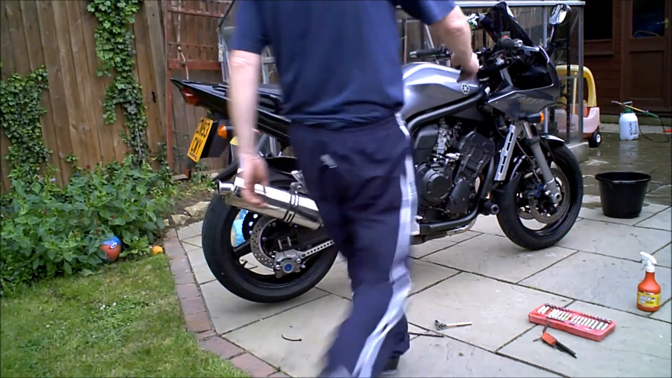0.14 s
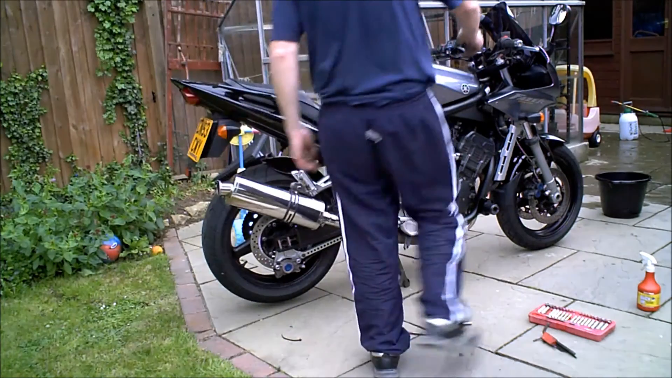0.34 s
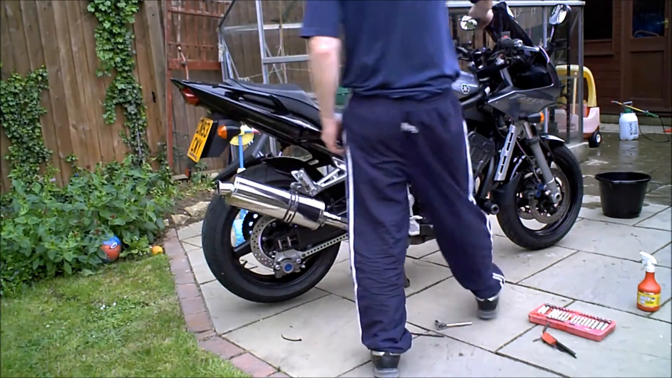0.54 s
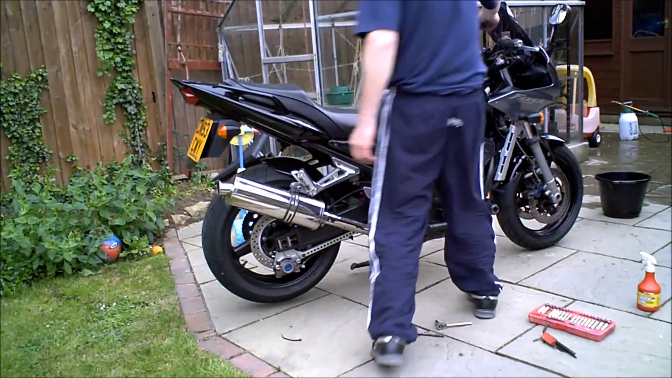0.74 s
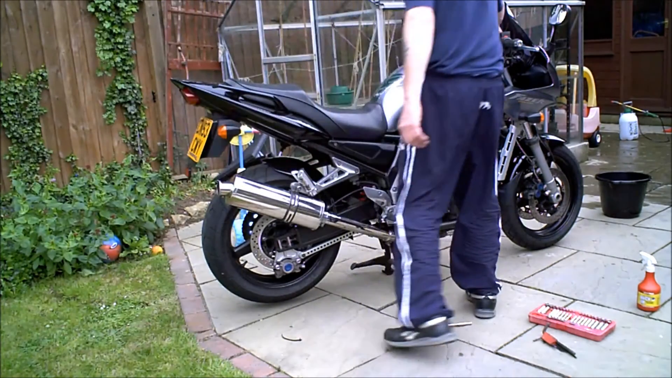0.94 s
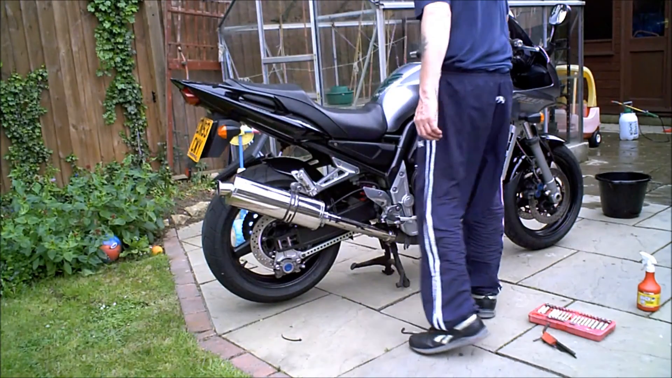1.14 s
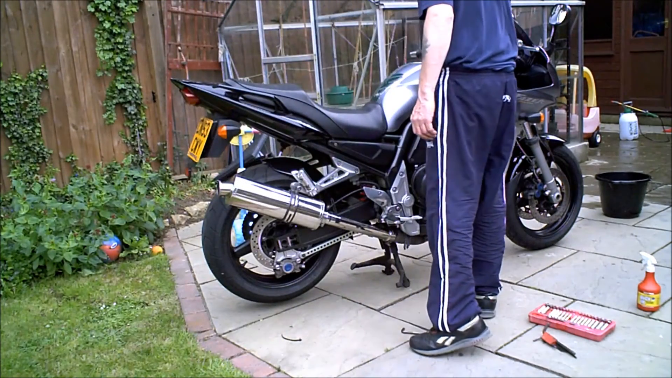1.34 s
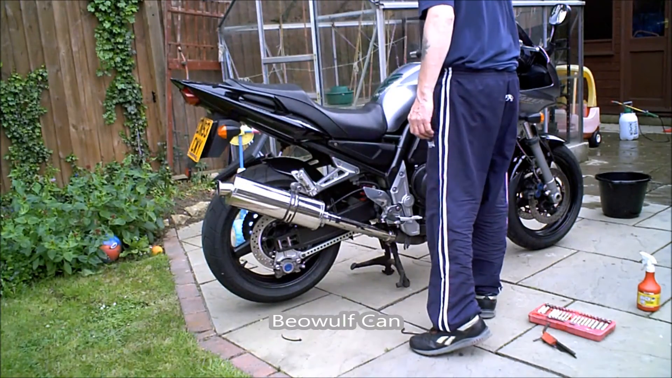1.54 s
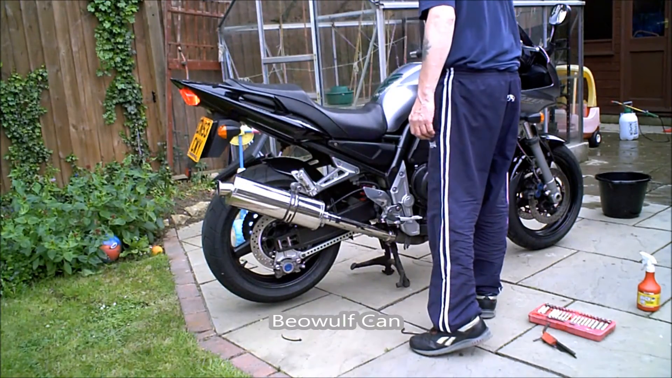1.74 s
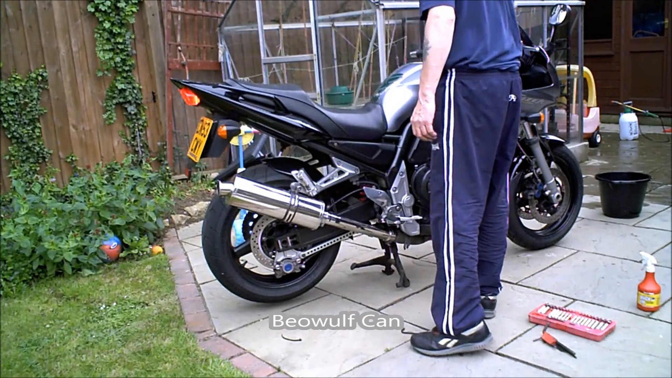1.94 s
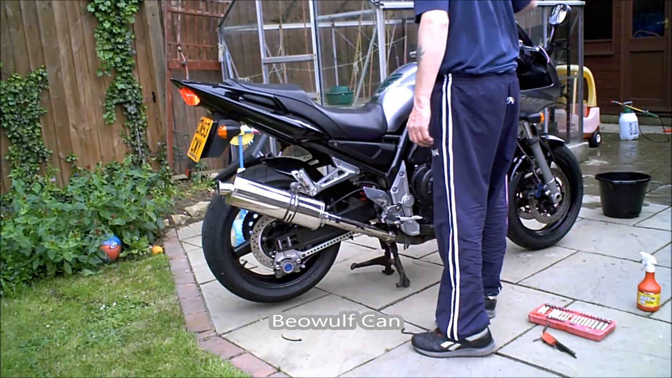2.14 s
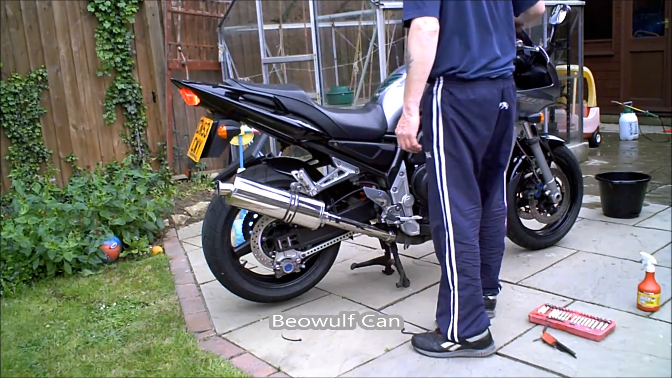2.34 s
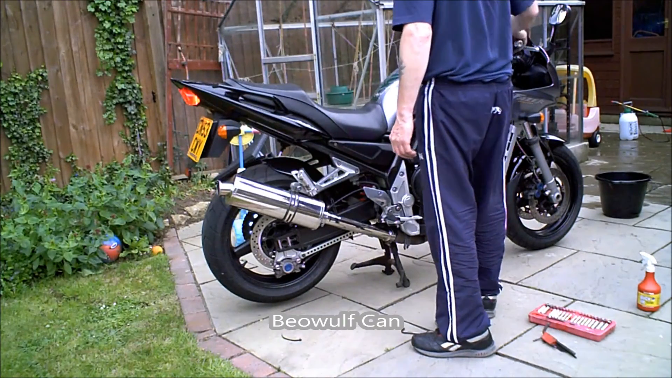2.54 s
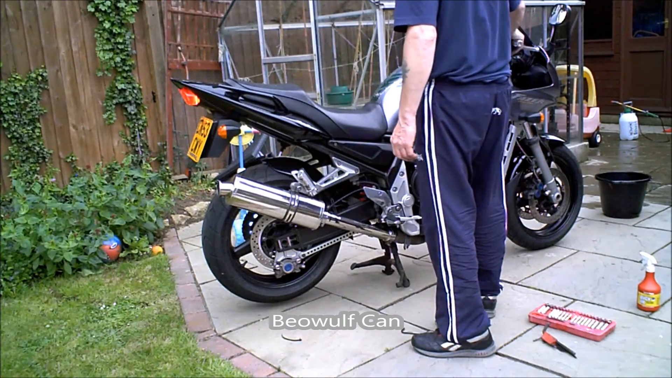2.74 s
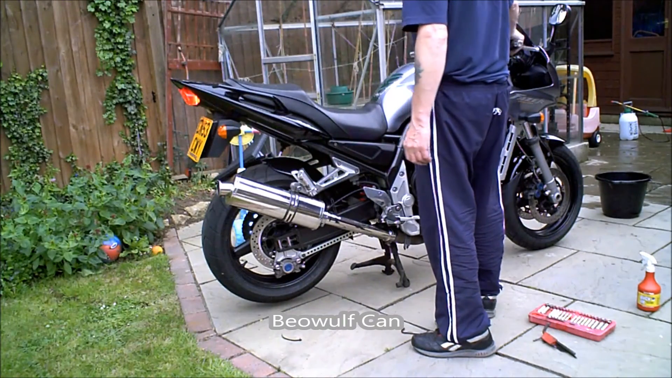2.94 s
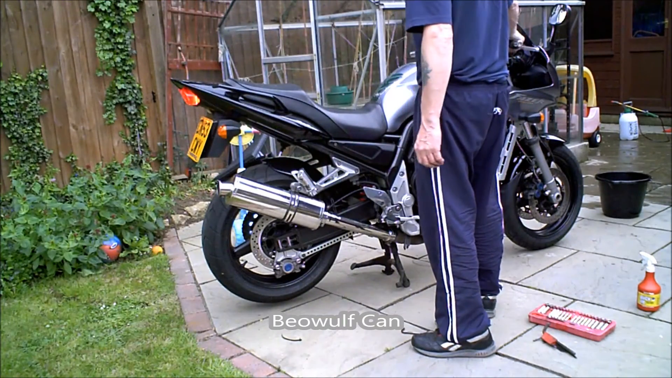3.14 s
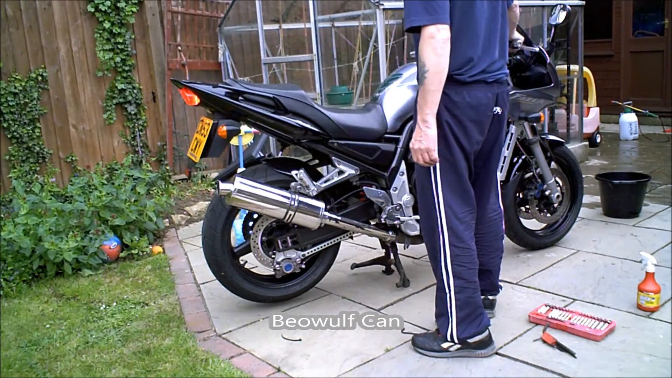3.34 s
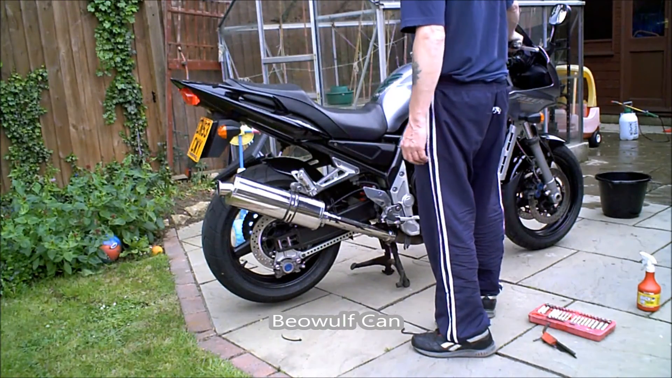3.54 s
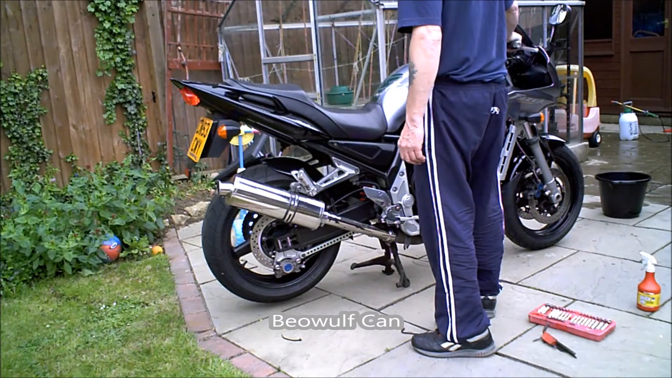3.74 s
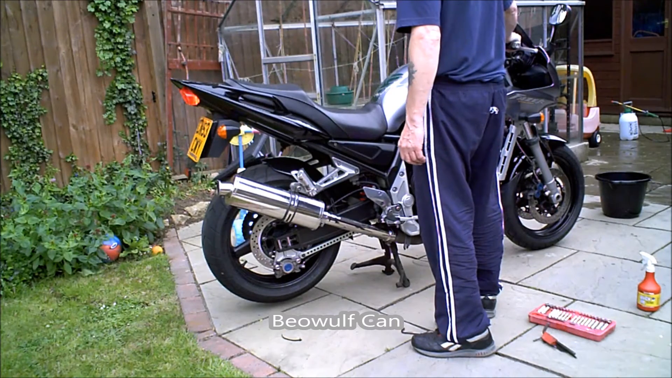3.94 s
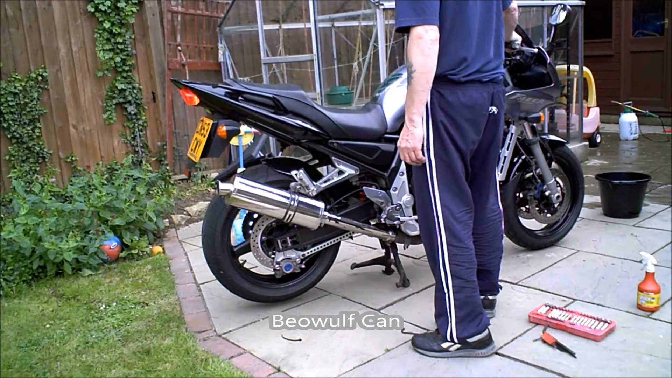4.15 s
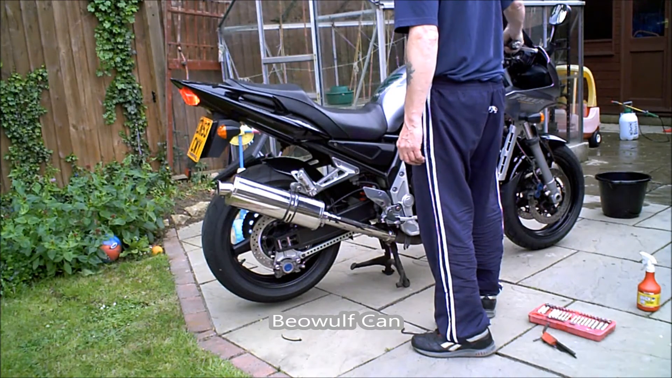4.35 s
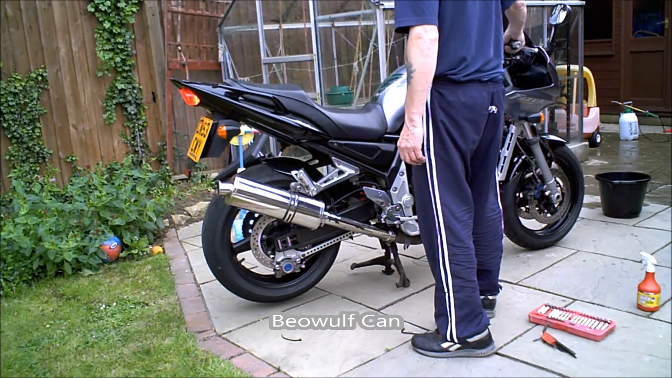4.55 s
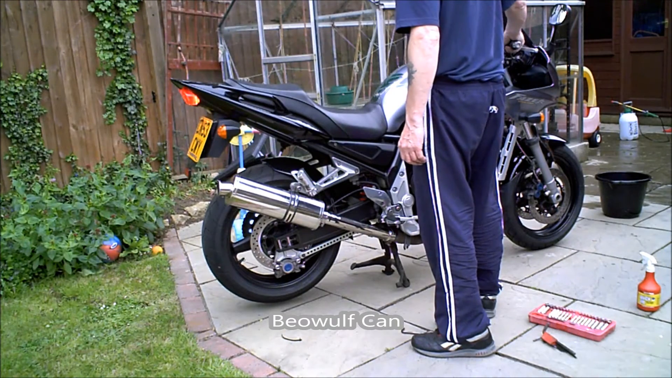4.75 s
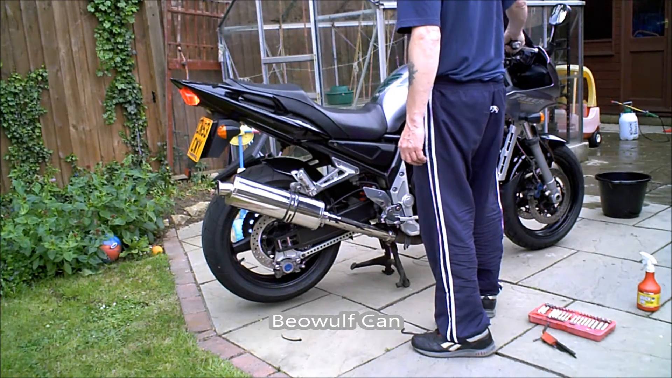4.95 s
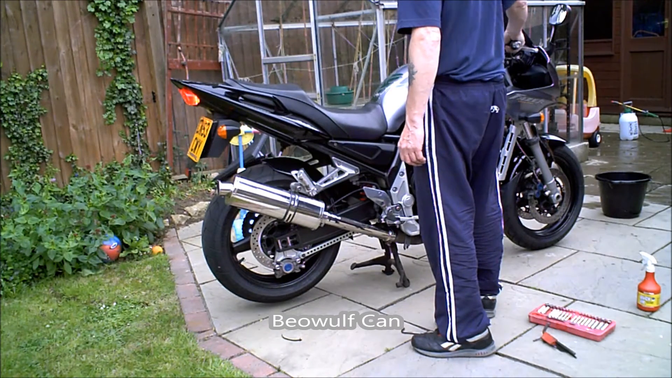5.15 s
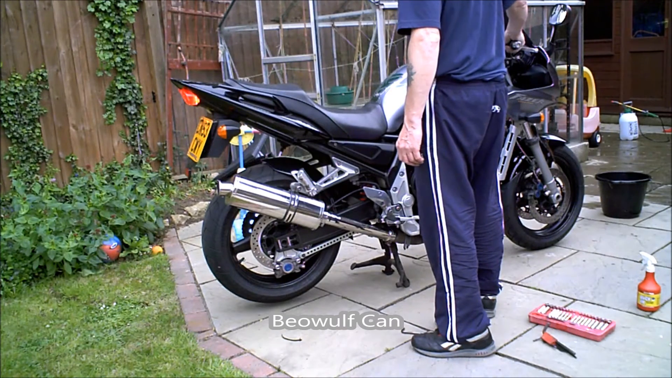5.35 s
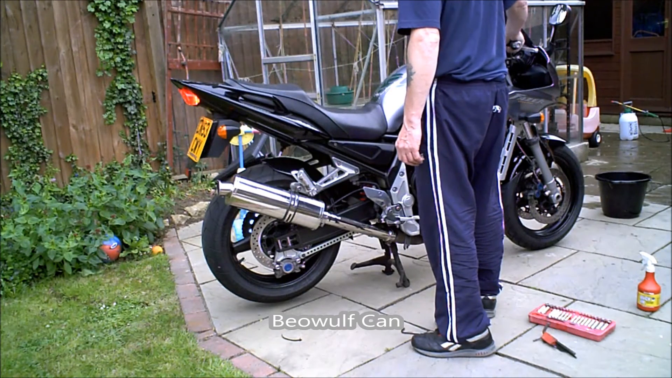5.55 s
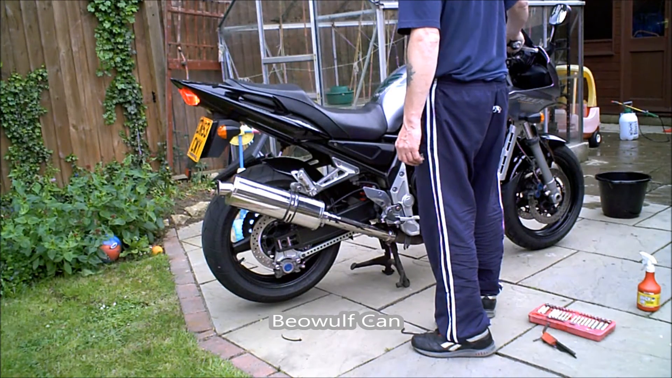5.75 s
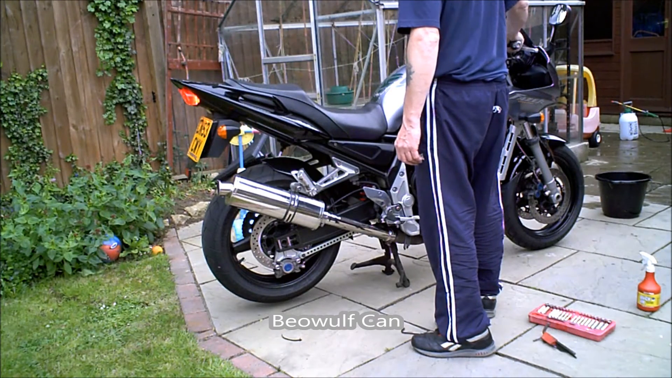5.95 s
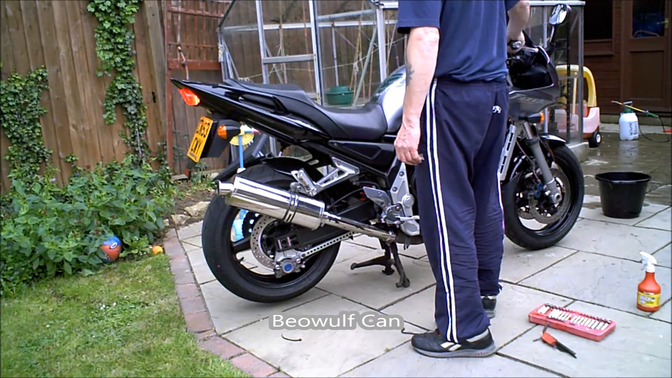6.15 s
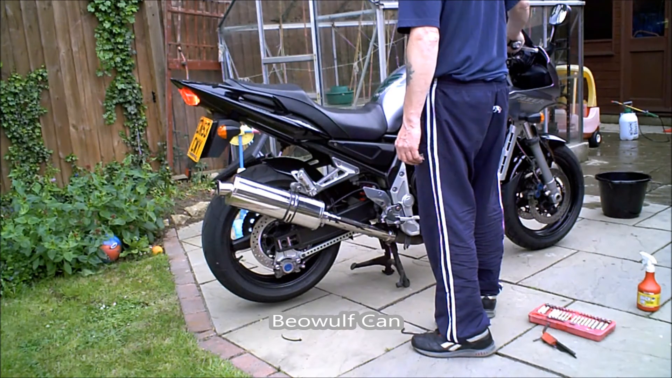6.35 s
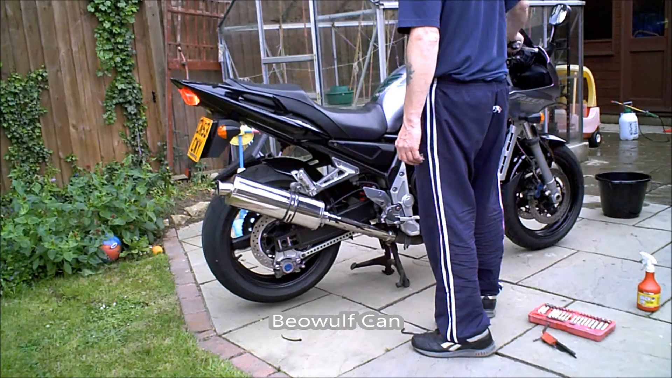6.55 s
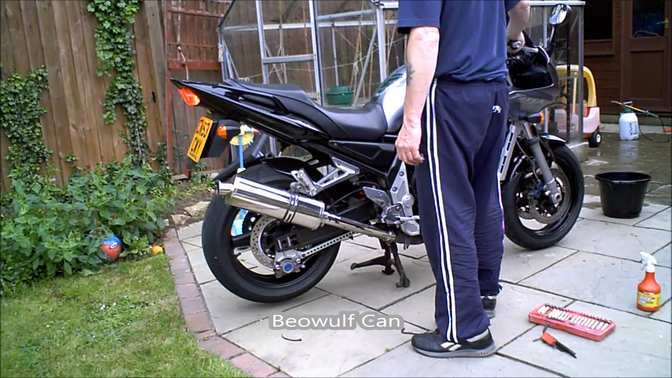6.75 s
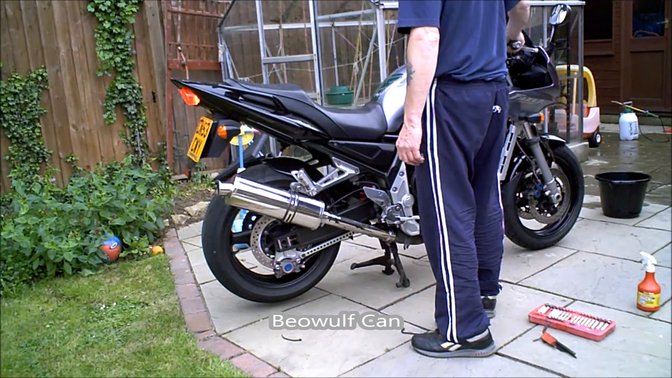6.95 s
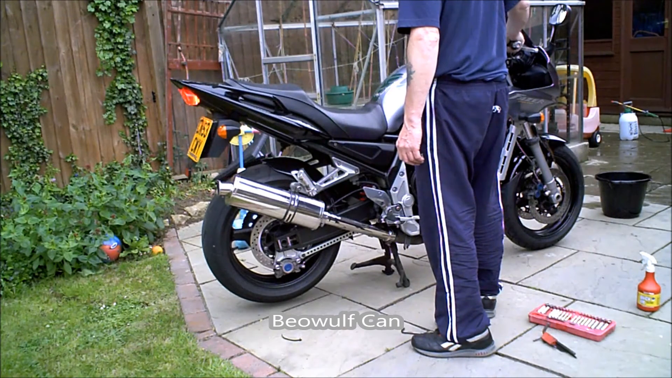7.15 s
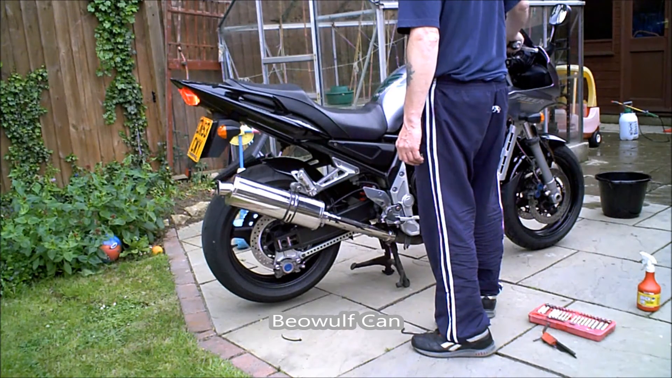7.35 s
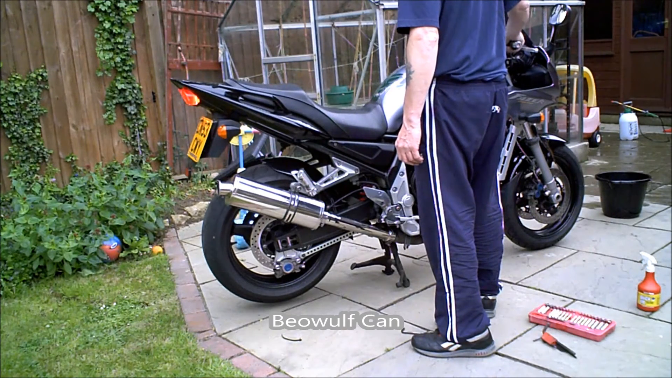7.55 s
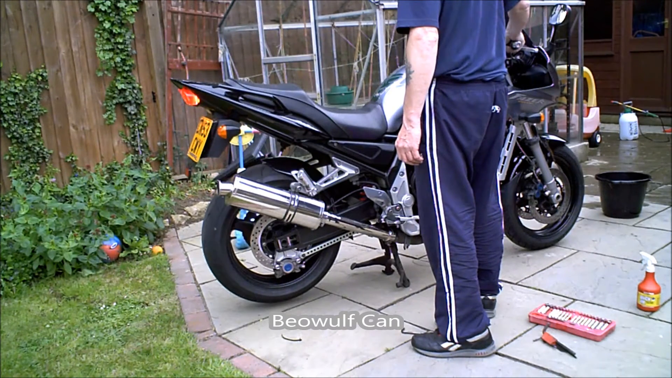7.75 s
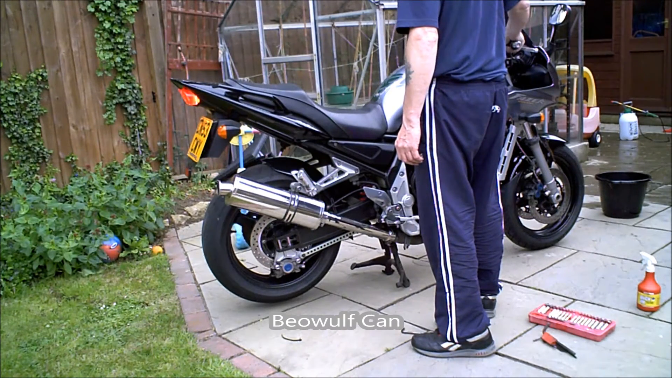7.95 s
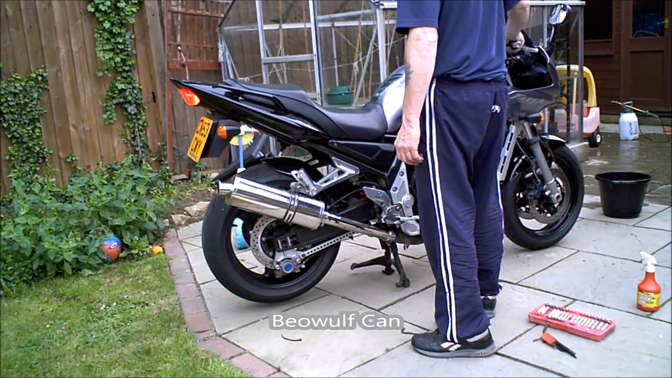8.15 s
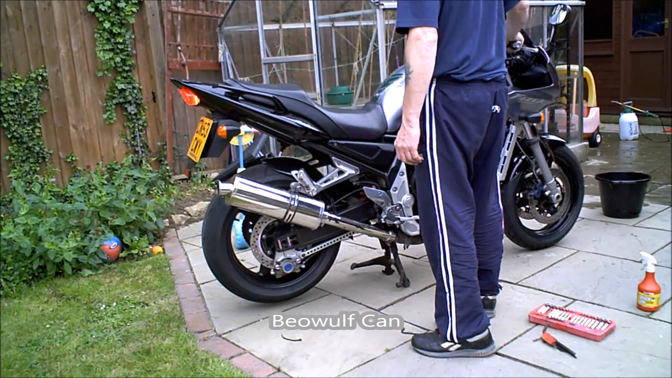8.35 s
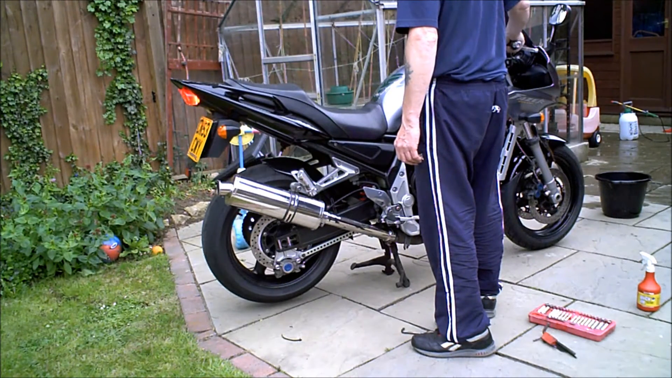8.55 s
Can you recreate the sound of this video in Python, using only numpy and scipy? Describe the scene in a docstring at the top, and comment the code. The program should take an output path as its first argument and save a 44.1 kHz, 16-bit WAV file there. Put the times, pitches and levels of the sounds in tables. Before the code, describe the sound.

A few soft shoe steps on patio slabs, a small metallic key snap and a faint sleeve rustle over a very quiet outdoor hush. After a pause, a brief grinding starter labours and the four-cylinder motorcycle engine catches with a low boom, idling fast and unevenly with ticking valves. Four sharp throttle blips follow, each falling back to idle. Fixed microphone a few metres away, short hard reflections from paving and fence.

```python
"""A four-cylinder motorcycle engine catches, idles fast and unevenly, then is revved by four throttle blips.
Before it: steps on a patio, key clicks, a sleeve, the grinding starter. A faint outdoor hush lies under all.
Firing pulses ring pipe and silencer; noise bursts make block and valves, swept sines the gear whine.
The starter is resonant noise with sagging tones; steps and key are decaying noise.
Hard echoes and a short diffuse tail stand for paving, fence and house wall."""
import sys
import numpy as np
from scipy import signal
from scipy.fft import rfft, irfft
from scipy.io import wavfile
from scipy.ndimage import uniform_filter1d

SR = 44100
rng = np.random.default_rng(int(sys.argv[2]) if len(sys.argv) > 2 else 0)


def bounce(signal):
    """Save signal as a 16-bit WAV file at the path given by the first command-line argument."""
    frames = np.transpose(np.atleast_2d(signal))
    limited = np.clip(frames, -1, 1)
    pcm = np.round(limited * 32767).astype(np.int16)
    wavfile.write(sys.argv[1], SR, pcm)


N = 379701
T = np.arange(N) / SR

# outdoor hush spectrum: (f/Hz, level/dB)
GARDEN_SPECTRUM = [(18, -92), (30, -37), (145, -17), (318, -4.5), (471, -3), (523, -1.5), (566, -3.5),
                   (645, -2), (816, -1.5), (981, 0), (1570, -7), (1840, -8.5), (2100, -10), (2330, -9.5),
                   (15800, -29)]
GARDEN_DB = -63
# shoes on paving: (t/s, level/dB, centre f/Hz, width/Hz, decay/s)
STEPS = [(.144, -49.5, 322, 300, .01), (.16, -46.5, 670, 350, 0.025), (0.173, -55.5, 1140, 400, 0.012),
         (.178, -58, 1920, 50, 0.02), (.206, -51.5, 5000, 7000, 0.0015), (.879, -61.5, 1190, 500, .022),
         (.932, -49, 650, 130, 0.01), (1.97, -61, 700, 300, .015), (2.082, -54.5, 640, 500, .008)]
# key clicks: (t/s, level/dB)
KEY_CLICKS = [(1.699, -47.5), (1.704, -49), (1.715, -56)]
# key click spectrum: (f/Hz, level/dB)
KEY_SPECTRUM = [(180, -52), (300, -11), (372, -20), (825, -1), (1020, -14), (1130, -3), (1920, -11),
                (2860, -6.5), (5940, -19), (7740, -9), (11300, -25), (13200, -21), (15800, -42)]
# ignition lock modes: (f/Hz, level/dB, t60/s)
LOCK_MODES = [(823, -6, .12), (1250, 3, .1), (2540, 3, 0.036), (2850, 3, 0.077), (4140, -12, .25),
              (7585, 2, .14), (8473, -10, .2), (12700, 2, .14)]
# sleeve rustle as the arm reaches for the bars: (t/s, level/dB)
SLEEVE_LEVEL = [(2.5, -94), (2.6, -72), (2.69, -66), (2.76, -78), (2.85, -92)]

STARTER_ON_S, STARTER_OFF_S, STARTER_RUNDOWN_S, STARTER_DB = 3.56, 4.02, 0.026, -44.5
# starter spectrum: (f/Hz, level/dB)
STARTER_SPECTRUM = [(29, -74), (50, -45), (251, -23.5), (297, -22), (343, -15), (530, -14.5), (1060, -4),
                    (1290, -6.5), (1530, -5), (1990, -15), (2300, -10.5), (3550, -16.5), (8450, -33),
                    (15800, -49)]
# starter drive and crankcase resonances: (f/Hz, width/Hz, level/dB)
CASE_MODES = [(830, 86, -6), (1041, 120, -5), (1540, 87, -22), (1860, 74, -6), (2297, 83, -1),
              (2684, 120, -4), (4220, 76, -6), (4570, 73, -7.5), (8500, 177, -8)]
# compressions the starter labours against:
# (t/s, length/s, load/dB, gear tone f/Hz, gear tone level/dB, upper tone f/Hz, upper tone level/dB)
COMPRESSIONS = [(3.612, 0.037, -43, 1686, -39, 2950, -43.5), (3.673, 0.047, -39.5, 1130, -31, 2360, -44),
                (3.723, 0.043, -41.5, 1660, -33.5, 1880, -35), (3.813, 0.027, -36.5, 1104, -35, 2400, -37),
                (3.9, 0.019, -37, 1070, -34.5, 2420, -36)]
LOAD_RISE_S, LOAD_FALL_S = 0.012, 0.0072
# share of its starting pitch that each tone loses per second under load
GEAR_SAG_PER_S, UPPER_SAG_PER_S = 3.18, 1.29

CATCH_S, CATCH_RISE_S = 3.95, 0.014
# cold engine, throttle shut: (t/s, speed/firings per s, boom level/dB)
IDLE = [(3.95, 45, -46.5), (4.03, 46, -44), (4.12, 45.5, -43), (4.5, 41, -47.5), (4.6, 40.5, -40.5),
        (5.05, 40.6, -40), (5.4, 39.3, -42.5), (5.82, 36, -43.5), (5.95, 39, -46), (6.0, 52, -43.5),
        (6.25, 44, -49), (6.5, 46, -48), (6.58, 52, -46.5), (7.3, 40.7, -47), (8.35, 35.5, -45.5)]
IDLE_HZ = 40  # firings per second, reference for the level laws
# throttle twists, the first two as the engine catches:
# (opens t/s, shuts t/s, opening time/s, opening/0-1, top speed/firings per s)
BLIPS = [(3.984, 4.036, 0.041, 0.13, 48), (4.118, 4.265, 0.017, 0.2, 59.4),
         (5.994, 6.134, 0.0067, 0.48, 83), (6.594, 6.726, 0.0052, 0.89, 111),
         (7.414, 7.599, 0.056, 0.85, 127), (8.394, 8.61, 0.058, 0.63, 98)]
THROTTLE_SHUT_S = 0.031
CLIMB_CURVE = 1.25  # exponent; above 1, the speed climbs slowly at first
COAST_S, COAST_TO_HZ = .375, 20  # friction drags the speed towards this until the idle holds it
# until first revved, the idle surges and sags in level
SURGE_HZ, SURGE_PEAK_S, SURGE_END_S = 5, 5.015, 5.95
SURGE_BOOM_DB, SURGE_VALVES_DB = 1.5, 2
# runs of strong firings as the speed falls back: (t/s, extra boom level/dB)
PICKUPS = [(4.27, 1), (4.42, 7), (6.43, 6.5), (6.54, 8.5), (7.14, 3), (7.31, 9), (7.72, 8), (7.93, 5),
           (8.19, 7.5)]
PICKUP_S = 0.041
# firings whose timing is fixed: (t/s, level change/dB)
TIMED_FIRINGS = [(5.999, -6), (6.602, -1), (6.708, 0), (7.491, 4.5), (8.479, 4)]

# level laws: (shut level at idle/dB, shut slope/dB per speed doubling,
#              open level at idle/dB, open slope/dB per speed doubling)
BOOM_LAW = (0.5, 2, 9.5, 3)  # added to the boom level in IDLE
# silencer bark, same columns
BARK_LAW = (-56, 8, -37, 1.5)
# engine block, same columns
BLOCK_LAW = (-48.5, 3.5, -45, -1.5)
# valve gear, same columns
VALVES_LAW = (-53.5, 2, -40.5, -2)

# exhaust pipe resonances: (f/Hz, width/Hz, level/dB)
PIPE_MODES = [(88.5, 25.7, -14.5), (133.5, 22, -10), (198.6, 15.8, 6), (246, 6.2, 5), (276, 25, -25)]
# airbox resonances, heard through the open throttle: (f/Hz, width/Hz, level/dB)
AIRBOX_MODES = [(81.5, 45, -31), (137, 16, -2), (243.3, 9, 5)]
# silencer resonances, strongest with the throttle open: (f/Hz, width/Hz, level/dB)
BARK_MODES = [(291, 94, 0.5), (357.6, 20, 3), (417.3, 7.6, 4.5), (464.5, 15, 2.5), (540, 14, -13),
              (624, 15, -29), (1070, 105, -8)]
# gas crack spectrum: (f/Hz, level/dB)
CRACK_SPECTRUM = [(300, -24), (600, -17), (1100, 30), (1800, 11), (3000, -18), (4500, 18), (6500, -36),
                  (8500, 13), (10400, 6.5), (12500, 0), (16000, -12)]
# the first firings after a snap of the throttle gulp the biggest charge: crack boost and its decay
SNAP_DB, SNAP_S = 7, 0.098
# engine block spectrum: (f/Hz, level/dB)
BLOCK_SPECTRUM = [(310, -35.5), (520, -2), (632, 2.5), (696, -6.5), (761, 1.5), (873, -1), (954, -5.5),
                  (1060, 3.5), (1230, -4.5), (1480, -7), (1750, -6), (2060, -8.5), (2420, -7.5),
                  (3600, -18), (4680, -37.5), (7920, -120)]
# valve gear spectrum: (f/Hz, level/dB)
VALVES_SPECTRUM = [(1760, -26.5), (3000, -1.5), (3770, -1), (4250, 1), (4780, -1.5), (5340, -1.5),
                   (6580, -6.5), (7610, -1.5), (8050, -5), (8750, -2), (9450, -6), (10200, -5.5),
                   (13600, -24), (15200, -22), (15800, -37)]
TREBLE_VARIATION_DB = 1  # rms of a slight random level variation in the treble
# engine covers that rattle at speed: (f/Hz, width/Hz, level/dB)
COVER_MODES = [(1116, 130, -2), (1226, 53, -9), (1401, 29, 2.5), (1556, 26, -5), (1814, 50, -2),
               (2330, 370, -3.5), (5300, 740, -6)]
WHINE_DB, WHINE_DB_PER_DOUBLING = -50, 3.5

# echoes from paving, fence and wall: (delay t/s, level/dB)
ECHOES = [(.0031, -18.5), (0.0114, -17.5), (0.0195, -37.5)]
TOP_HZ = 15850


def undb(db):
    """Decibels to gain."""
    return 10 ** (np.asarray(db) / 20)


def curves(table):
    """Each column of a table, joined by straight lines in time."""
    s, *columns = np.transpose(table)
    return [np.interp(T, s, c) for c in columns]


def unit(x):
    """Scale to rms 1."""
    return x / np.sqrt(np.mean(x ** 2))


def steady(x, size=3500):
    """Scale to a running rms of 1."""
    power = uniform_filter1d(uniform_filter1d(x ** 2, size), size)
    return x / np.sqrt(power + 1e-18)


def noise():
    """White noise."""
    return rng.standard_normal(N)


def walk(rate_hz):
    """Smooth random curve of rms 1."""
    k = int(SR / rate_hz)
    stairs = np.repeat(rng.standard_normal(N // k + 1), k)
    return unit(uniform_filter1d(uniform_filter1d(stairs, k), k)[:N])


def through(x, response):
    """Pass a sound through an impulse response."""
    return signal.fftconvolve(x, response)[:N]


def colour(x, points, size=2048):
    """Minimum-phase filter of unit energy with the given (f/Hz, level/dB) outline."""
    hz, db = np.transpose(points)
    grid_hz = np.arange(size + 1) * SR / size / 2
    outline_db = np.interp(np.log(grid_hz + 1), np.log(hz), db)
    # fold the cepstrum to make the filter causal
    cepstrum = irfft(np.log(undb(outline_db)))
    cepstrum[1:size] *= 2
    cepstrum[size + 1:] = 0
    response = irfft(np.exp(rfft(cepstrum)))[:size]
    return through(x, response / np.linalg.norm(response))


def ring(x, modes, size=12000):
    """Decaying resonances (f/Hz, width/Hz, level/dB), unit energy in all."""
    t = T[:size]
    response = sum(undb(db) * width_hz * np.exp(-np.pi * width_hz * t) * np.cos(2 * np.pi * hz * t)
                   for hz, width_hz, db in modes)
    return through(x, response / np.linalg.norm(response))


def band(x, low_hz, high_hz, order=3):
    """Band-pass."""
    edges_hz = [low_hz, min(high_hz, .45 * SR)]
    return signal.sosfilt(signal.butter(order, edges_hz, "band", fs=SR, output="sos"), x)


def fade(start_s, decay_s):
    """Sudden start, exponential decay."""
    return (T >= start_s) * np.exp(-np.maximum(T - start_s, 0) / decay_s)


def gate(start_s, end_s, attack_s, release_s):
    """Straight rise, hold, exponential release."""
    rise = np.clip((T - start_s) / attack_s, 0, 1)
    return rise * np.exp(-np.maximum(T - end_s, 0) / release_s)


def pulses(turns, scatter_db, jitter_s, lumpy_db=0):
    """One pulse per whole count, random in size and timing; lumpy_db sets a repeating four-pulse pattern."""
    at = np.flatnonzero(np.diff(np.floor(turns)) > 0)
    chance = rng.standard_normal((len(at), 2))
    cylinder = np.cos(np.pi / 2 * np.arange(len(at)))
    shifted = at + (jitter_s * SR * chance[:, 0]).astype(int)
    out = np.zeros(N)
    out[np.clip(shifted, 0, N - 1)] = undb(scatter_db * chance[:, 1] + lumpy_db * cylinder)
    return out


def bursts(hits, decay_s):
    """A decaying puff of noise after each pulse."""
    return noise() * signal.lfilter([1], [1, -np.exp(-1 / (decay_s * SR))], hits)


def garden():
    """Faint outdoor hush: shaped noise that barely wavers."""
    return unit(colour(noise(), GARDEN_SPECTRUM)) * undb(GARDEN_DB + 0.52 * walk(3.1))


def footsteps():
    """Shoes on paving: each contact is resonant noise with a sudden start and a decay."""
    steps = 0
    for s, db, hz, width_hz, decay_s in STEPS:
        contact = unit(band(ring(noise(), [(hz, width_hz, 0)]), hz / 3, hz * 3, order=2))
        steps = steps + contact * undb(db) * fade(s, decay_s)
    return band(steps, 100, 11500, order=2)


def ignition_key():
    """The key snaps round: noise clicks excite the modes of the lock."""
    snap = noise() * sum(undb(db) * (fade(s, 0.0043) + undb(-15.0) * fade(s, 0.045)) for s, db in KEY_CLICKS)
    modes = [(hz, np.log(1000) / np.pi / t60_s, db) for hz, db, t60_s in LOCK_MODES]  # t60 to width
    return undb(1) * colour(snap, KEY_SPECTRUM) + undb(-8) * ring(snap, modes)


def sleeve():
    """Cloth rustle: band noise whose level flutters."""
    return unit(band(noise(), 1300, 2100, order=2)) * undb(curves(SLEEVE_LEVEL)[0] + 1.7 * walk(60))


def starter():
    """Gears grind into the crankcase, growing louder and sagging in pitch against each compression."""
    load = undb(STARTER_DB) * gate(STARTER_ON_S, STARTER_OFF_S, 0.0019, STARTER_RUNDOWN_S)
    shudder = .5 * walk(250)  # phase/rad
    squeal = 0
    for s, length_s, load_db, gear_hz, gear_db, upper_hz, upper_db in COMPRESSIONS:
        strain = gate(s, s + length_s, LOAD_RISE_S, LOAD_FALL_S)
        load = load + undb(load_db) * strain
        since_s = np.clip(T - s, 0, 2 * length_s)
        gear_phase = 2 * np.pi * np.cumsum(gear_hz * (1 - GEAR_SAG_PER_S * since_s)) / SR + shudder
        upper_phase = 2 * np.pi * np.cumsum(upper_hz * (1 - UPPER_SAG_PER_S * since_s)) / SR + shudder
        gear = undb(gear_db) * (np.sin(gear_phase) + undb(-15.0) * np.sin(2 * gear_phase))
        squeal = squeal + strain * (gear + undb(upper_db) * np.sin(upper_phase))
    case = band(ring(noise(), CASE_MODES), 570, 7700, order=2)
    grind = unit(undb(-1.0) * case + colour(noise(), STARTER_SPECTRUM))
    rasp = undb(-10) * unit(band(noise(), 2800, 9500))
    chug = undb(-37) * unit(band(noise(), 84, 293, order=2))
    return (grind + rasp + chug) * load + squeal


def speed(idle_hz):
    """Firings per second: climbs while the throttle is open, then coasts down to the idle."""
    hz = idle_hz
    for opens_s, shuts_s, _, _, top_hz in BLIPS:
        from_hz = np.interp(opens_s, T, hz)
        progress = np.clip((T - opens_s) / (shuts_s - opens_s), 0, 1)
        climb = from_hz + (top_hz - from_hz) * progress ** CLIMB_CURVE
        coast = COAST_TO_HZ + (top_hz - COAST_TO_HZ) * fade(shuts_s, COAST_S)
        hz = np.select([T < opens_s, T < shuts_s], [hz, climb], np.maximum(coast, idle_hz))
    return hz


def crank(hz):
    """Running count of firings, nudged so that the count is whole at each timed firing."""
    turns = np.cumsum(hz) / SR
    s = np.transpose(TIMED_FIRINGS)[0]
    excess = np.unwrap(np.interp(s, T, turns), period=1)
    return turns - np.interp(T, s, excess)


def loudness(law, hz, throttle):
    """Level/dB of one part: follows engine speed, and the throttle adds its share."""
    shut_db, shut_slope_db, open_db, open_slope_db = law
    doublings = np.log2(hz / IDLE_HZ)
    shut = undb(shut_db + shut_slope_db * doublings)
    opened = undb(open_db + open_slope_db * doublings)
    return 20 * np.log10(shut + throttle * opened)


def exhaust(turns, throttle, boom_db, bark_db):
    """Firings ring the pipe; an open throttle adds the airbox, a bark and a sharp crack of gas."""
    change_db = sum(db * (np.abs(T - s) < .003) for s, db in TIMED_FIRINGS)
    firings = -pulses(turns, scatter_db=1.35, jitter_s=0.00022, lumpy_db=2.0) * undb(change_db)
    drive = steady(firings)
    gas = steady(bursts(firings, decay_s=.009))
    blast = drive + undb(-7) * gas
    pipe = steady(band(ring(blast, PIPE_MODES), 82, 330, order=1))
    airbox = steady(ring(blast, AIRBOX_MODES))
    # the firing tone itself only radiates once the engine runs fast
    drone = band(np.sin(2 * np.pi * turns), 85.3, 270.0, order=8)
    boom = steady(band(pipe + undb(0.5) * throttle * airbox + undb(-6.0) * drone, 44, 330, order=3))
    # off the throttle the firings are weak and smooth turbulence takes over
    flow = throttle * drive + undb(-9) * gas + undb(-12) * noise()
    bark = steady(band(ring(flow, BARK_MODES), 244, 1500, order=2))
    snap_db = SNAP_DB * sum(fade(opens_s + rise_s, SNAP_S) for opens_s, _, rise_s, _, _ in BLIPS)
    sharp_gas = steady(bursts(firings, decay_s=0.0045))
    crack = steady(colour(drive + undb(1) * sharp_gas, CRACK_SPECTRUM)) * undb(snap_db)
    return boom * undb(boom_db) + (bark + undb(-7) * throttle * crack) * undb(bark_db)


def block_and_covers(turns, hz, block_db):
    """Two knocks a firing clatter in the block and rattle the covers, which grow steeply with speed."""
    knocks = steady(bursts(pulses(2 * turns, scatter_db=5.5, jitter_s=.0016), decay_s=0.005))
    block = steady(colour(knocks + undb(2.5) * noise(), BLOCK_SPECTRUM))
    rattle = steady(band(ring(knocks + noise(), COVER_MODES), 960, 8700, order=2))
    covers = rattle * undb(-40.5) * (hz / 100) ** 2.07
    return block * undb(block_db) + covers


def valve_gear(turns, valves_db):
    """Tappets tick once a firing over the rush of the cam chain."""
    tappets = bursts(pulses(turns, scatter_db=4, jitter_s=.0004, lumpy_db=1.5), decay_s=.0055)
    ticks = steady(band(tappets, 5700, 21000, order=1))
    chain = steady(bursts(pulses(4 * turns, scatter_db=13.5, jitter_s=0.0013), decay_s=0.0072))
    rush = undb(-8) * chain + undb(-1.5) * noise()
    return steady(colour(ticks + rush, VALVES_SPECTRUM)) * undb(valves_db)


def gear_whine(turns, hz, throttle):
    """The primary gears sing on the overrun and quieten when the throttle pulls them tight."""
    mesh = 21.8 * turns  # tooth contacts
    # the crank speeds up and slows within each firing, and backlash smears the tone
    phase = 2 * np.pi * mesh + .7 * np.sin(2 * np.pi * turns) + .8 * walk(110)
    flutter = undb(3.3 * walk(55))
    tone = (np.sin(phase) + undb(-9.0) * np.sin(2 * phase) + undb(-4) * np.sin(3 * phase)) * flutter
    level = undb(WHINE_DB + WHINE_DB_PER_DOUBLING * np.log2(hz / IDLE_HZ))
    return level * (1 - 0.5 * throttle) * band(tone, 720, 1700, order=1)


def engine():
    """The throttle sets the speed; the two together drive every part."""
    throttle = sum(opening * gate(opens_s, shuts_s, rise_s, THROTTLE_SHUT_S)
                   for opens_s, shuts_s, rise_s, opening, _ in BLIPS)
    idle_hz, idle_boom_db = curves(IDLE)
    hz = speed(idle_hz)
    turns = crank(hz)
    surge = np.cos(2 * np.pi * SURGE_HZ * (T - SURGE_PEAK_S)) * (T < SURGE_END_S)
    pickup_db = sum(db * np.exp(-((T - s) / PICKUP_S) ** 2) for s, db in PICKUPS)
    boom_db = idle_boom_db + loudness(BOOM_LAW, hz, throttle) + SURGE_BOOM_DB * surge + pickup_db
    bark_db = loudness(BARK_LAW, hz, throttle)
    block_db = loudness(BLOCK_LAW, hz, throttle)
    variation_db = TREBLE_VARIATION_DB * walk(22)
    valves_db = loudness(VALVES_LAW, hz, throttle) + SURGE_VALVES_DB * surge + variation_db
    parts = exhaust(turns, throttle, boom_db, bark_db)
    parts = parts + block_and_covers(turns, hz, block_db) + valve_gear(turns, valves_db)
    parts = parts + gear_whine(turns, hz, throttle)
    return np.clip((T - CATCH_S) / CATCH_RISE_S, 0, 1) * parts


def patio(x, t60_s=0.25, tail_db=-13, size=20000):
    """Direct sound, a few hard echoes and a short diffuse tail."""
    decay = undb(-60 * T[:size] / t60_s) * (T[:size] > .008)
    tail = band(rng.standard_normal(size), 220, 6200, order=1) * decay
    response = undb(tail_db) * tail / np.linalg.norm(tail)
    for delay_s, db in ECHOES:
        response[int(delay_s * SR)] += undb(db)
    # the low boom bends round fence and clutter; mainly mids and treble come back
    return x + through(band(x, 590, 10300, order=1), response)


def scene():
    """Rider, starter and engine on the patio, over the hush."""
    hush = garden()
    rider = footsteps() + ignition_key() + sleeve()
    return (patio(rider + starter() + engine()) + hush)[None]


def record(dry):
    """Steep low-pass at the top of the treble."""
    return signal.sosfilt(signal.ellip(10, .2, 70, TOP_HZ, fs=SR, output="sos"), dry)


dry = scene()
out = record(dry)
bounce(out)
```